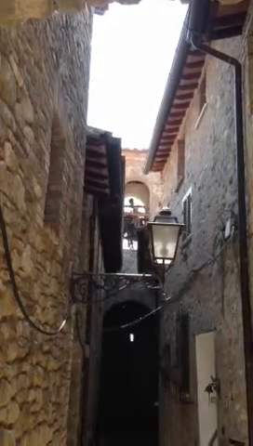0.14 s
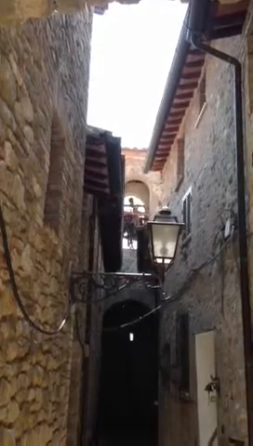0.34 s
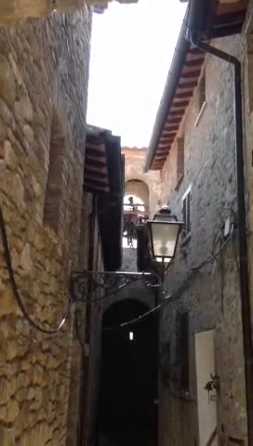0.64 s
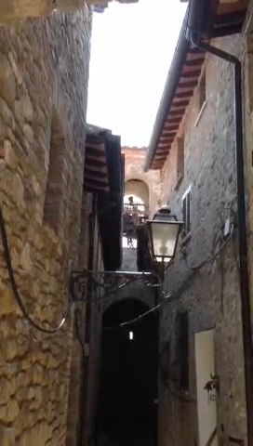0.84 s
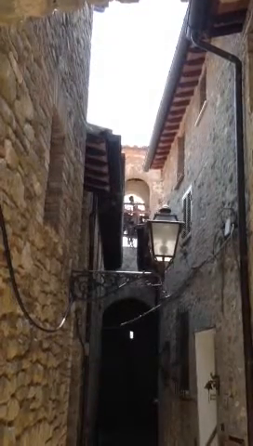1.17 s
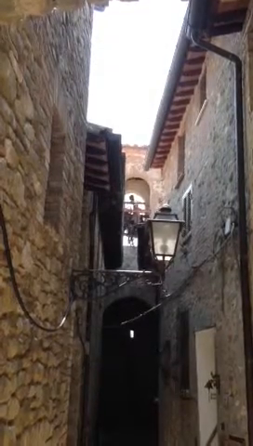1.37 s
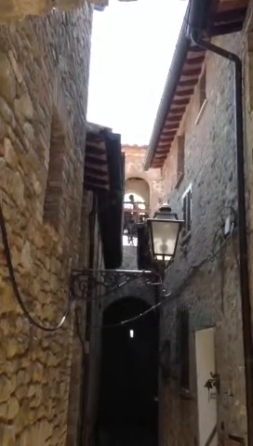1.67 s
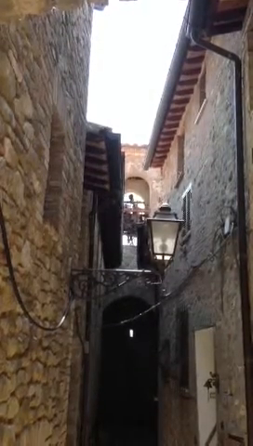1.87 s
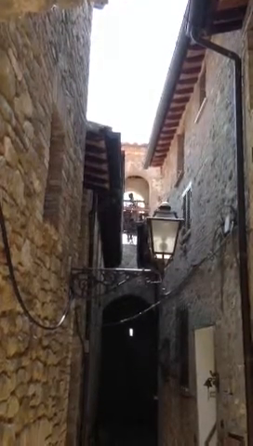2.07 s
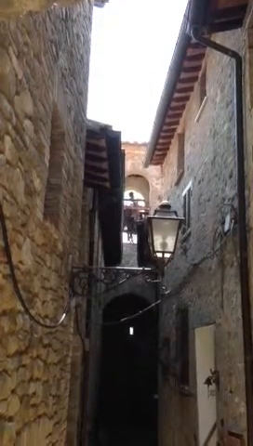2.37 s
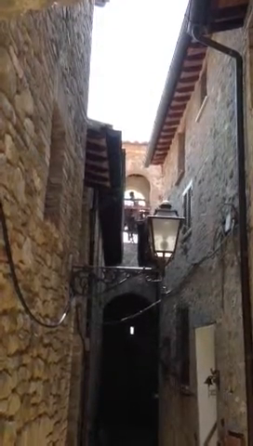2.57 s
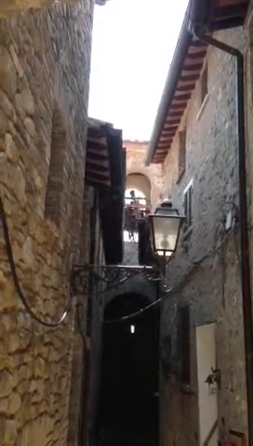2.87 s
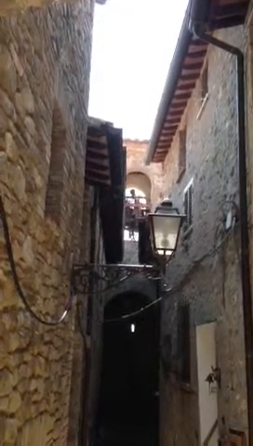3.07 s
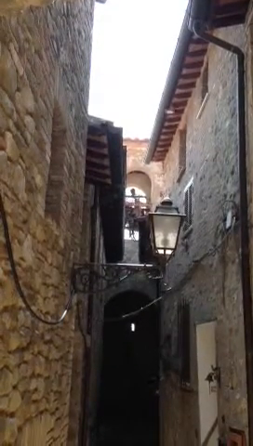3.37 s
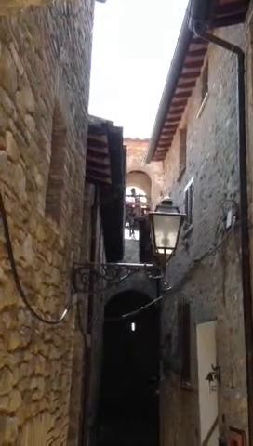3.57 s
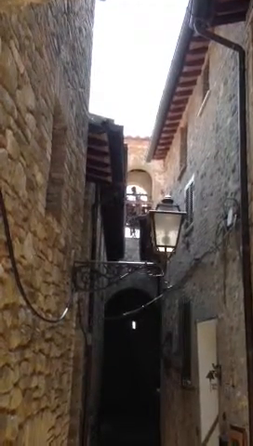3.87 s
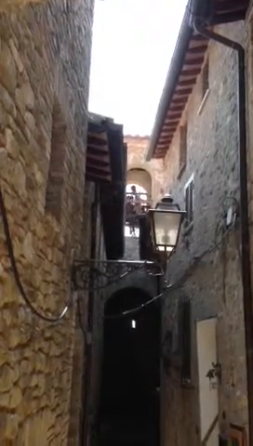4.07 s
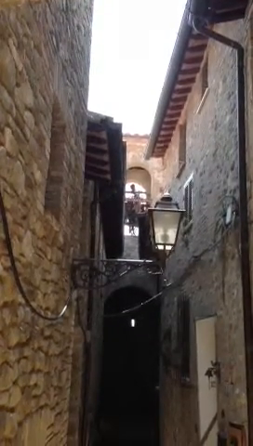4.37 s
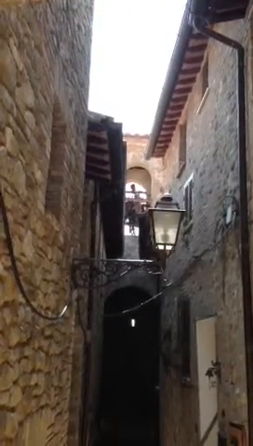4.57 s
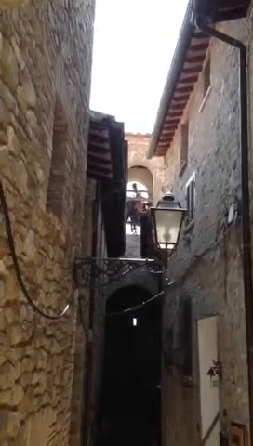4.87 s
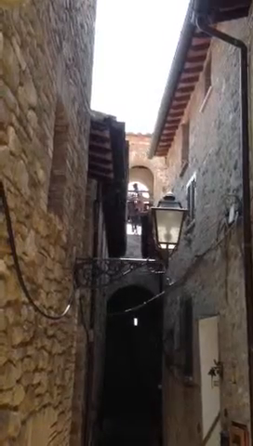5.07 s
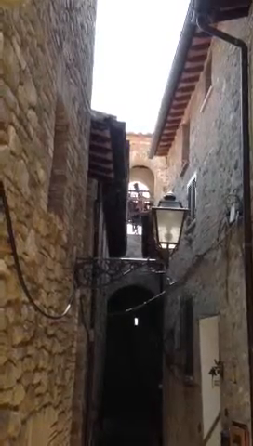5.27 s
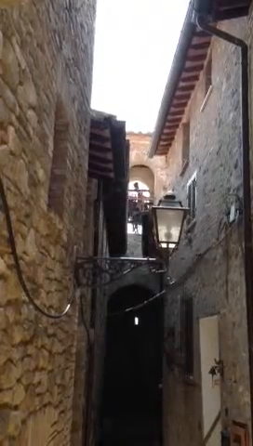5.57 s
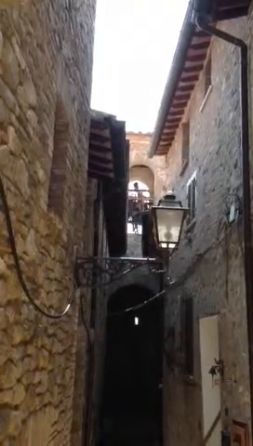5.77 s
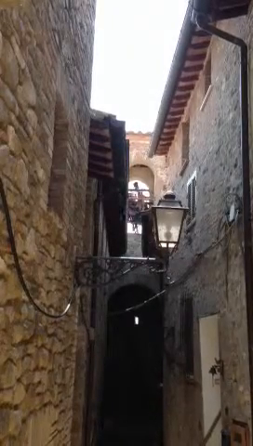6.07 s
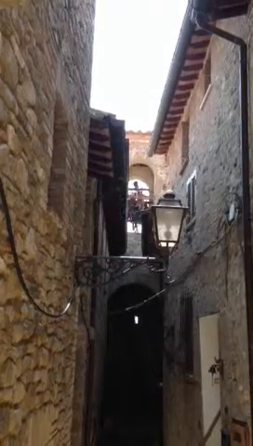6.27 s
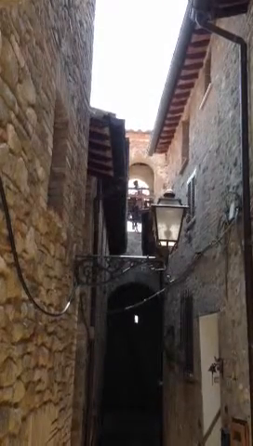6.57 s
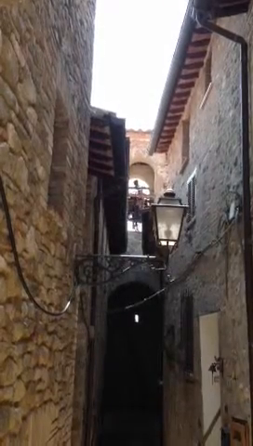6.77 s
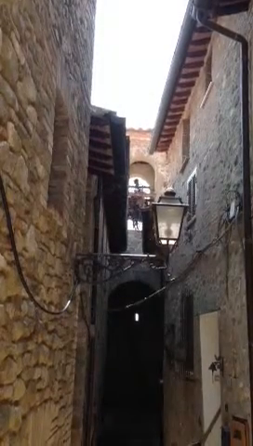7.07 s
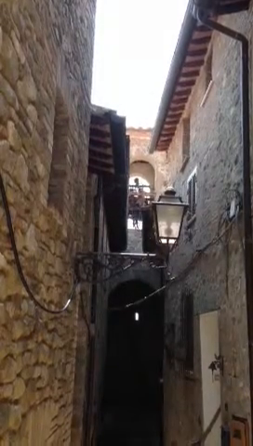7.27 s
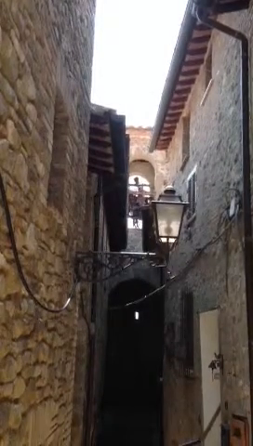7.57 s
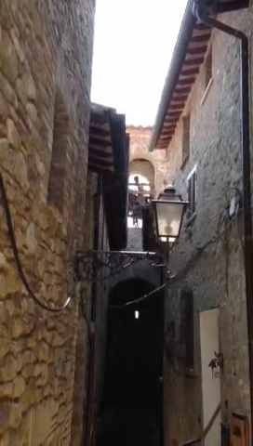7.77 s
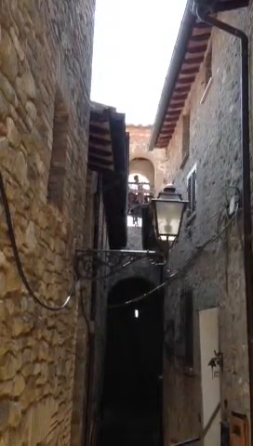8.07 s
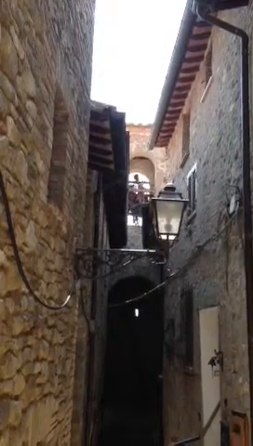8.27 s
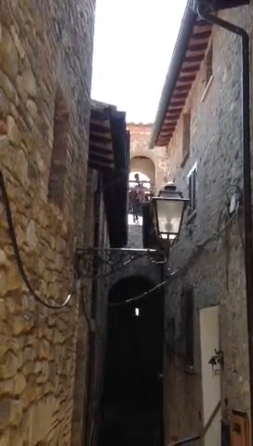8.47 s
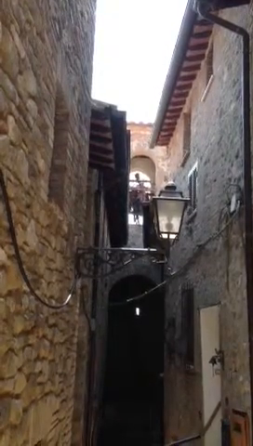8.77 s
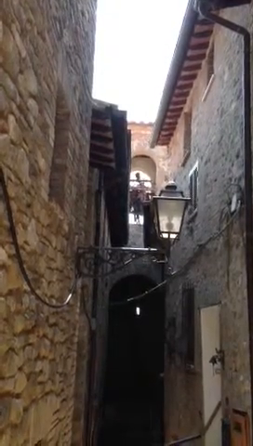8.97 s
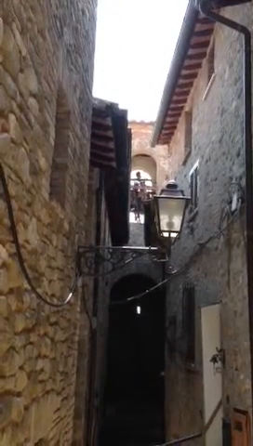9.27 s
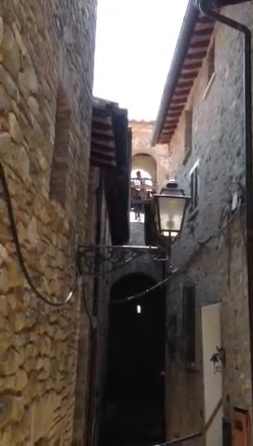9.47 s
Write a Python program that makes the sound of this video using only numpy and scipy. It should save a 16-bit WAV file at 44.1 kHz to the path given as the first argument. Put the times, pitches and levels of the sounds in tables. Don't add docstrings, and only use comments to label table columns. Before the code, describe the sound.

Steady swinging church bell, metallic clang roughly every second, its ring shimmering and echoing off close stone walls over a faint town rumble.

```python
import sys
import numpy as np
from scipy import signal
from scipy.io import wavfile

SR = 44100
rng = np.random.default_rng(int(sys.argv[2]) if len(sys.argv) > 2 else 0)


def persist_wave(psi):
    counts = np.round(np.clip(psi, -1, 1) * 32767).astype(np.int16)
    wavfile.write(sys.argv[1], SR, np.atleast_2d(counts).T)


def ratio_of_db(decibels):
    return 10 ** (np.asarray(decibels, float) / 20)


N = 424683

# t/s, minor partials level/dB, treble tilt/(dB/octave)
BLOWS = [(-.75, -4, -2), (.2462, -3, -2), (1.4015, -1, 3.5), (2.4028, -3, -2.5), (3.5412, -2, -5.5),
         (4.5437, -3, -1), (5.6747, -3, -3), (6.6725, -4, -2), (7.8262, -3, 1), (8.781, -8, -2)]
# hum level/dB, hum swell level/dB, prime level/dB, prime fall/(dB/s)
HUM_PRIME = [(-46, -50, -48, 2), (-60, -43, -41, 4), (-64, -45, -41, 2), (-61, -43, -37, 2),
             (-50, -46, -49, 4), (-58, -45, -45, 2), (-48, -43, -48, 3), (-52, -45, -48, 2),
             (-47, -41, -47, 4), (-54, -44, -44, 2)]
# level at blow/dB, level at next blow/dB, node crossing after blow t/s
TIERCE = [(-36, -33, .65), (-36, -40, .8), (-38, -40, .73), (-33, -39, .73), (-31, -33, .72),
          (-35, -42, .74), (-34, -35, .7), (-31, -40, .72), (-32, -33, .65), (-30, -40, .72)]
# after blow t/s, width/s
HUM_SWELL = [
    (.6, .3),
    (.9, .25),
]
HUM_HZ, PRIME_HZ, TIERCE_HZ = 235.0, 475.0, 588.5
TIERCE_LEAK_DB = -16

# level at blow/dB, lobe facing at mid turn/(0-1), fall/(dB/s)
QUINT = [(-33.4, 0.88, 20.0), (-53.7, 0.36, 0.0), (-40.5, 0.96, 20.0), (-51.1, 0.36, 12.0),
         (-42.0, 0.92, 20.0), (-50.6, 0.36, 12.0), (-40.9, 0.0, 24.0), (-54.4, 0.56, 0.0),
         (-44.9, 0.88, 16.0), (-58.9, 0.72, 0.0)]
NOMINAL = [(-17.8, 0.68, 20.0), (-22.3, 0.28, 20.0), (-18.8, 0.12, 28.0), (-29.6, 0.32, 12.0),
           (-21.1, 0.08, 24.0), (-34.4, 0.44, 8.0), (-20.2, 0.12, 24.0), (-42.5, 0.68, 0.0),
           (-21.8, 0.16, 24.0), (-42.6, 0.0, 0.0)]
TENTH = [(-25.0, 0.72, 20.0), (-30.3, 0.84, 24.0), (-33.1, 0.0, 24.0), (-29.4, 0.84, 28.0),
         (-25.3, 0.08, 36.0), (-33.0, 0.92, 20.0), (-23.8, 0.08, 48.0), (-29.9, 0.88, 24.0),
         (-29.7, 0.28, 36.0), (-39.9, 0.92, 20.0)]
SUPERQUINT = [(-23.9, 0.76, 20.0), (-21.7, 0.8, 28.0), (-14.5, 0.88, 40.0), (-24.6, 0.88, 32.0),
              (-19.8, 0.0, 32.0), (-23.8, 0.08, 28.0), (-16.7, 0.04, 40.0), (-25.8, 0.08, 32.0),
              (-19.7, 0.2, 36.0), (-22.4, 0.2, 32.0)]
OCTAVE_NOMINAL = [(-30.1, 0.28, 20.0), (-25.0, 0.0, 36.0), (-16.2, 0.44, 36.0), (-29.1, 0.12, 24.0),
                  (-8.7, 0.44, 52.0), (-27.6, 0.36, 24.0), (-15.9, 0.8, 44.0), (-26.3, 0.4, 24.0),
                  (-21.0, 0.36, 40.0), (-35.2, 0.76, 20.0)]
SECOND_RIM = [(-21.6, 0.84, 20.0), (-24.0, 0.56, 20.0), (-14.4, 0.88, 32.0), (-30.7, 0.92, 16.0),
              (-15.4, 0.96, 32.0), (-23.1, 0.76, 24.0), (-5.9, 0.96, 48.0), (-29.4, 0.88, 20.0),
              (-13.5, 0.16, 40.0), (-33.2, 0.16, 24.0)]
THIRD_RIM = [(-25.4, 0.04, 20.0), (-24.0, 0.4, 32.0), (-13.4, 0.72, 48.0), (-27.9, 0.36, 28.0),
             (-14.9, 0.6, 48.0), (-22.0, 0.48, 40.0), (-15.5, 0.88, 48.0), (-33.2, 0.4, 28.0),
             (-30.2, 0.24, 20.0), (-26.9, 0.52, 40.0)]
FOURTH_RIM = [(-39.7, 0.92, 20.0), (-26.5, 0.6, 40.0), (-25.4, 0.76, 40.0), (-23.1, 0.76, 48.0),
              (-24.4, 0.76, 44.0), (-23.7, 0.64, 44.0), (-27.9, 0.96, 40.0), (-27.6, 0.76, 44.0),
              (-23.1, 0.56, 48.0), (-33.7, 0.64, 36.0)]
SWEPT_HZ = [729.0, 1012.4, 1234.0, 1524.6, 2105.0, 2747.0, 3426.0, 4134.0]
# lobes per half turn/1, fastest turning after blow t/s, node leak/(0-1)
LOBES = [
    [(.75, .6, .55), (.75, .5, .3)],
    [(1.01, .3, .3), (.75, .4, .3)],
    [(.75, .4, .15), (.51, .2, .15)],
    [(1.75, .4, .3), (2.25, .9, .3)],
    [(3.0, .6, .45), (1.75, .9, .15)],
    [(1.5, .7, .1), (1.25, .4, .3)],
    [(1.5, .4, .3), (.75, .2, .3)],
    [(1.75, .3, .5), (1.01, 1.0, .15)],
]

# f/Hz, level/dB, t60/s
RIM = [
    (3428, -36, 3.2),
    (4137, -42, 2.2),
    (4859, -25, 1.45),
]
# third level/dB, fourth level/dB, fifth level/dB
RIM_HIT = [(-8, -6, -9), (-5, -2, -9), (0, -1, -3), (-7, -1, -8), (0, -1, -4), (-5, 0, -7), (0, -2, -3),
           (-12, -5, -11), (-7, 0, -6), (-10, -9, -11)]
# f/Hz, level/dB, t60/s
MINOR = [(2108, -43, 3.5), (2751, -40, 4.0), (1298, -35, 2.1), (1593, -37, 1.6), (1938, -42, 2.1),
         (2013, -40, .9), (2412, -42, 1.8), (2573, -38, .6), (2945, -38, .8), (3290, -37.5, 2.1),
         (3768, -36, 1.1), (4064, -41, 1.1), (4223, -38, .8), (4737, -41, .7), (5050, -41, .7),
         (5276, -43, .6), (5594, -30.5, 1.1), (6094, -43, .8), (6306, -35, .95), (7019, -39, .7)]
# f/Hz, level/dB
SHIMMER = [(2200, -52), (4500, -51), (6000, -45), (8000, -50), (11000, -62), (15000, -76)]
# f/Hz, level/dB, t60/s
CLANG = [(40, -98, .25), (150, -72, .25), (600, -41, .3), (2300, -28, .34), (5000, -31, .34),
         (9000, -47, .25), (15000, -57, .12)]
# f/Hz, level per band/dB
RUMBLE = [(30, -110), (70, -99), (110, -87.5), (200, -59), (300, -77), (650, -67), (900, -77), (2500, -84),
          (5000, -70), (9000, -75), (15000, -75)]
# t/s, length/s, level/dB
RASP = [(.6, .1, -60), (1.02, .33, -61), (3.24, .24, -61), (4.0, .15, -65), (5.36, .18, -66),
        (9.03, .14, -62), (9.41, .28, -58)]
# rim travel along path/m, extra delay/s, echo spread/s, level/dB
PATHS = [
    (.06, .0, .002, 0),
    (.26, .006, .008, -2),
    (-.21, .018, .025, -2),
    (.38, .040, .090, -2),
    (-.44, .030, .060, -3),
]

SWING_S, SWING_PEAK_S = 2.143, .33
FLUTTER_HZ, FLUTTER_AT_2KHZ, FLUTTER_SLOPE = 50, .11, 1.5
LEAD = SR
RING = 96000
STEP = 16
TAIL = 12000


def at_hz(points, hz, column=1):
    points = np.array(points)
    return np.interp(np.log(hz), np.log(points[:, 0]), points[:, column])


def since_blow(lead=0):
    t = np.arange(-lead, N) / SR
    times = np.array([b[0] for b in BLOWS] + [BLOWS[-2][0] + SWING_S])
    k = np.maximum(np.searchsorted(times, t) - 1, 0)
    return k, t - times[k], times[k + 1] - t


def swing_lag(metres, t):
    return metres / 343 * np.cos(2 * np.pi * (t - SWING_PEAK_S) / SWING_S)


def flutter(hz, size):
    noise = rng.standard_normal((2, size // STEP + 1))
    lowpass = signal.butter(4, FLUTTER_HZ, fs=SR / STEP, output="sos")
    a, b = signal.sosfilt(lowpass, noise)
    depth = FLUTTER_AT_2KHZ * (hz / 2000) ** FLUTTER_SLOPE / a.std()
    return np.interp(np.arange(size) / STEP, np.arange(len(a)), 1 + depth * (a + 1j * b))


def low_voices():
    k, since, until = since_blow()
    t = np.arange(N) / SR
    hum_db, swell_db, prime_db, fall_db = np.array(HUM_PRIME)[k].T
    swell_s, width_s = np.array(HUM_SWELL)[k % 2].T
    swell = np.exp(-((since - swell_s) / width_s) ** 2)
    hum = ratio_of_db(hum_db - 3) + ratio_of_db(swell_db - 2.5) * swell
    prime = ratio_of_db(1.5 + prime_db - fall_db * since + 4 * np.exp(-since / .08))

    first_db, last_db, cross_s = np.array(TIERCE)[k].T
    tierce_db = 2.5 + first_db + (last_db - first_db) * since / (since + until)
    lobe = np.tanh((cross_s - since) / .16) + 1j * ratio_of_db(TIERCE_LEAK_DB)
    tierce = ratio_of_db(tierce_db) * lobe * (-1.) ** k

    out = 0
    for level, hz, metres in [(hum, HUM_HZ, .4), (prime, PRIME_HZ, .08), (tierce, TIERCE_HZ, .05)]:
        level = signal.lfilter([.004], [1, -.996], level)
        moved_s = t - swing_lag(metres, t - .47)
        out = out + np.real(level * flutter(hz, N) * np.exp(2j * np.pi * hz * moved_s))
    return np.sqrt(2) * out


def swept_voices():
    k, since, _ = [column[::STEP] for column in since_blow(LEAD)]
    t, out = np.arange(-LEAD, N) / SR, 0
    voices = [QUINT, NOMINAL, TENTH, SUPERQUINT, OCTAVE_NOMINAL, SECOND_RIM, THIRD_RIM, FOURTH_RIM]
    for hz, blows, lobes in zip(SWEPT_HZ, voices, LOBES):
        start_db, facing, fall_db = np.array(blows)[k].T
        count, fastest_s, leak = np.array(lobes)[k % 2].T
        turn = np.sin(2 * np.pi * (since - fastest_s) / SWING_S)
        lobe = np.hypot(np.cos(np.pi * (count * turn + facing)), leak)
        level = ratio_of_db(start_db - fall_db * since) * lobe
        level = signal.lfilter([.077 ** 2], [1, -2 * .923, .923 ** 2], level)
        tone = np.real(flutter(hz, len(t)) * np.exp(2j * np.pi * hz * t))
        out = out + np.interp(t, t[::STEP], level) * tone
    return np.sqrt(2) * out


def ring(hz, t60, db_per_blow):
    pole = (2j * np.pi * hz - np.log(1000) / t60)[:, None, None] / SR
    start = np.exp(2j * np.pi * rng.random(pole.shape))
    coarse, fine = np.arange(0, RING, 300)[:, None], np.arange(300)
    steps = np.moveaxis(start * np.exp(pole * coarse), 0, 2)[:, 0]
    within = np.exp(pole * fine)[:, 0]
    rise = (1 - np.exp(-np.arange(RING) / SR / .004)) ** 2
    out = np.zeros(N + LEAD + RING)
    for blow, gains in zip(BLOWS, ratio_of_db(db_per_blow)):
        sound = np.imag(steps * gains @ within).ravel()
        out[round(blow[0] * SR) + LEAD:][:RING] += rise * sound
    return out[:N + LEAD]


def struck_modes():
    _, minor_db, tilt_db = np.transpose(BLOWS)
    small_hz = np.sort(rng.uniform(2200, 15200, 170))
    small_db = at_hz(SHIMMER, small_hz) + 4.0 * rng.standard_normal(len(small_hz))
    small_t60 = .72 * (small_hz / 6000) ** -.6 * rng.uniform(.6, 1.4, len(small_hz))
    hz, db, t60 = np.transpose([*RIM, *MINOR, *zip(small_hz, small_db, small_t60)])
    scatter_db = 2.5 * rng.standard_normal((len(BLOWS), len(hz)))
    octaves_up = np.maximum(np.log2(hz / 3500), 0)
    strength_db = minor_db[:, None] + np.outer(tilt_db, octaves_up) + scatter_db
    strength_db[:, :len(RIM)] = RIM_HIT
    return ring(hz, t60, db + strength_db)


def lane(direct, scattered):
    t, out = np.arange(-LEAD, N) / SR, 0
    dense = signal.resample_poly([direct, scattered], 2, 1, axis=1)
    dense_t = np.arange(-2 * LEAD, 2 * N) / (2 * SR)
    for k, (metres, delay_s, spread_s, db) in enumerate(PATHS):
        moved = np.interp(t - delay_s - swing_lag(metres, t), dense_t, dense[min(k, 1)])
        if k:
            cluster = rng.standard_normal(TAIL) * np.exp(-np.arange(TAIL) / SR / spread_s)
            cluster /= np.sqrt(np.sum(cluster ** 2))
            moved = ratio_of_db(db) * signal.oaconvolve(moved, cluster)[:len(t)]
        out = out + moved
    return out[LEAD:]


def noise_bands(gain_at):
    out, white = 0, rng.standard_normal((2, N))
    edges = 25 * 2 ** np.arange(0, 9.6, .5)
    for k, (low, high) in enumerate(zip(edges, edges[1:])):
        bandpass = signal.butter(2, [low, high], "band", fs=SR, output="sos")
        band = signal.sosfilt(bandpass, white[k % 2])
        out = out + band / band.std() * gain_at(np.sqrt(low * high))
    return out


def clang_and_town():
    k, since, _ = [column[::STEP] for column in since_blow()]
    _, minor_db, tilt_db = np.array(BLOWS)[k].T
    rise = (1 - np.exp(-since / .005)) ** 2

    def gain_at(hz):
        blow_db = minor_db + tilt_db * max(np.log2(hz / 3500), 0)
        decay_db = 60 * since / at_hz(CLANG, hz, column=2)
        clang = rise * ratio_of_db(at_hz(CLANG, hz) + blow_db - decay_db)
        return np.repeat(clang + ratio_of_db(at_hz(RUMBLE, hz)), STEP)[:N]

    return noise_bands(gain_at)


def bearing():
    t, level = np.arange(N) / SR, 0
    for start_s, length_s, db in RASP:
        rise = np.clip((t - start_s) / .06, 0, 1)
        fall = np.clip(1.6 - 1.6 * (t - start_s) / length_s, 0, 1)
        level = level + ratio_of_db(db) * rise * fall
    slips = rng.standard_normal(N) * (rng.random(N) < 2500 / SR)
    steel = signal.butter(2, [3900, 6100], "band", fs=SR, output="sos")
    band = signal.sosfilt(steel, signal.sosfilt(steel, slips))
    return level * band / band.std()


def scene():
    struck, swept = struck_modes(), swept_voices()
    scattered = ratio_of_db(-13) * swept + ratio_of_db(-2.5) * struck
    bell = low_voices() + lane(swept + struck, scattered)
    return (bell + clang_and_town() + bearing())[None]


def top_cut(x):
    return signal.sosfilt(signal.butter(12, 15370, fs=SR, output="sos"), x)


def record(dry):
    return top_cut(dry)


dry = scene()
out = record(dry)
persist_wave(out)
```